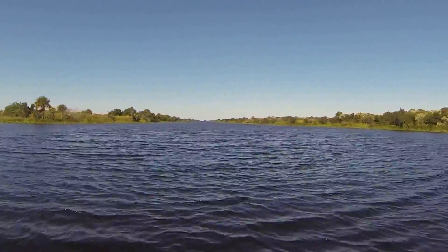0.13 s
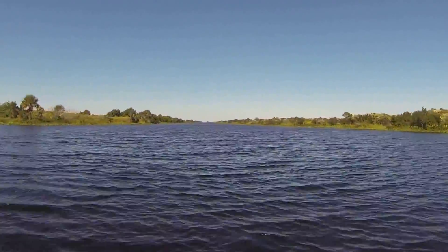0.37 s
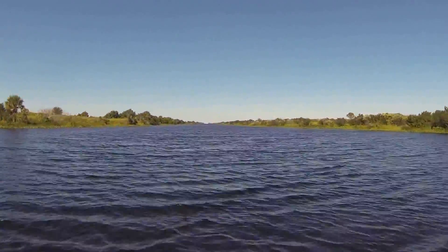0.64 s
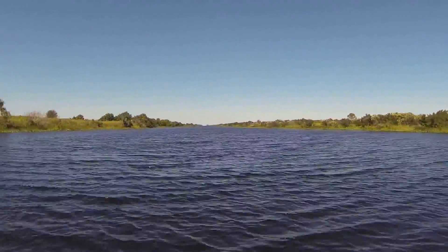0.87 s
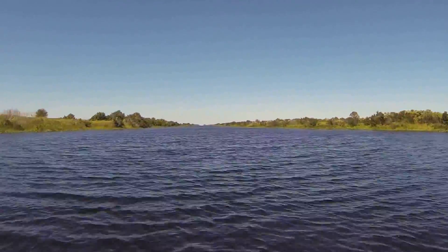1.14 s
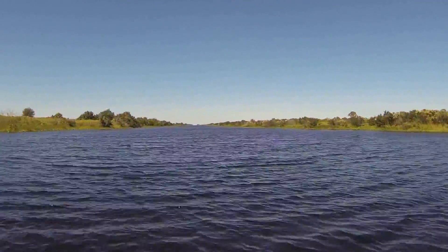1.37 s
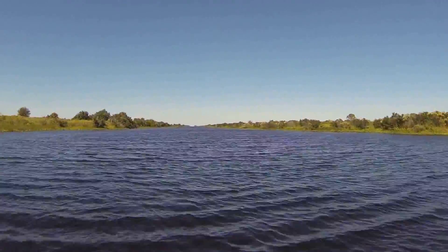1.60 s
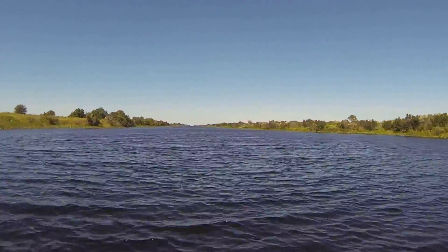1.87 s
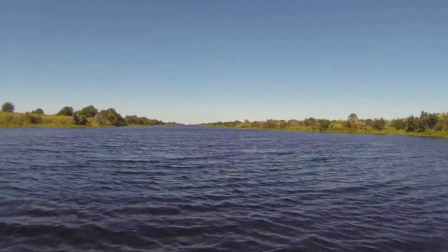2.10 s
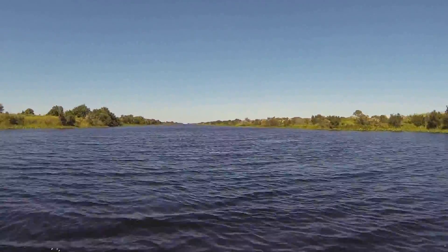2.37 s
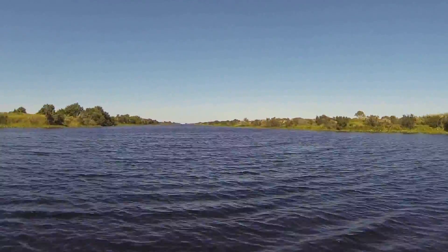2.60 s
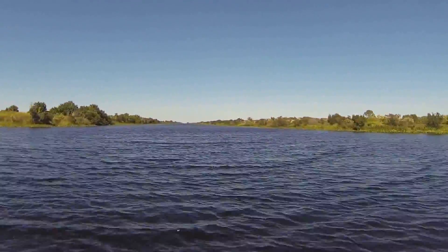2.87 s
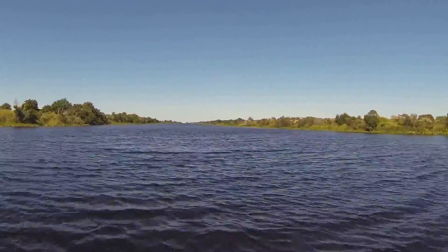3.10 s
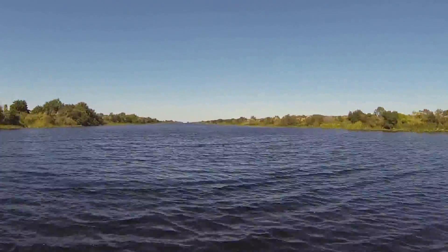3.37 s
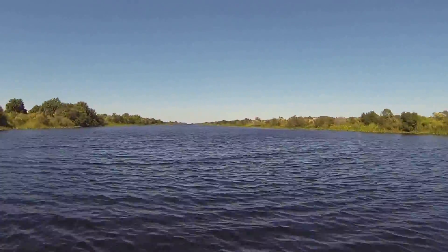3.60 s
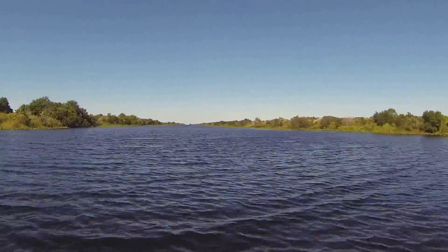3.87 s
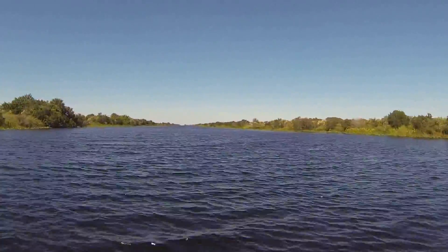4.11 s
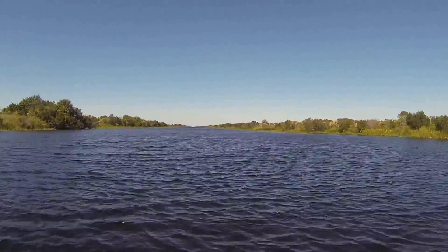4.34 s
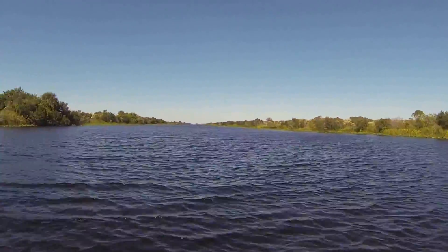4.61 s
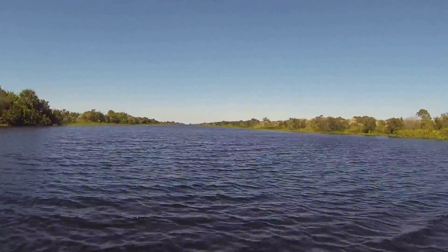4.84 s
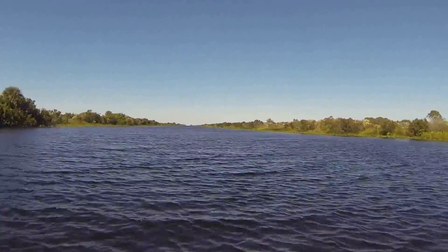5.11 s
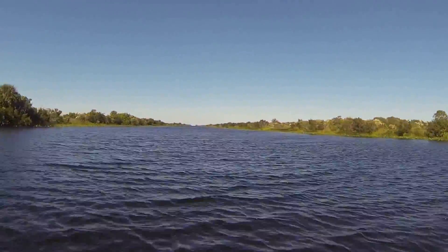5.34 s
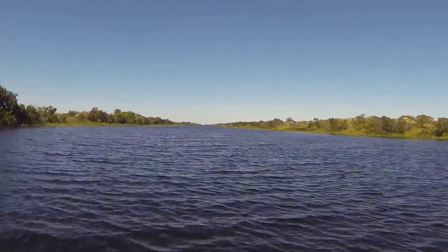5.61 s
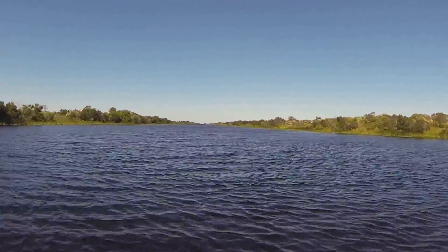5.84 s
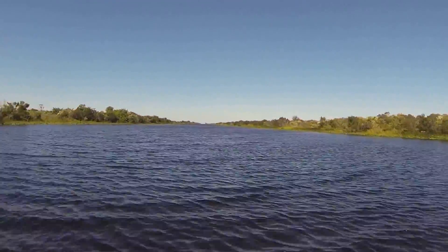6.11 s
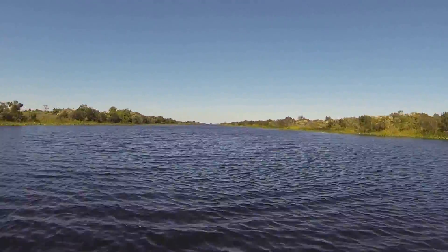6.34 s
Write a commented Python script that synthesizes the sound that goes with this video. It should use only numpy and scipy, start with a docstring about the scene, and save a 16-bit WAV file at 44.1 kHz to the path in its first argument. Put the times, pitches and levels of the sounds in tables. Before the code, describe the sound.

On a propeller-driven boat crossing open water, a low engine drone runs without a break under heavy wind rumble and a thin hiss of spray. Dull wind thumps hit the small enclosed microphone every fraction of a second, hardest just before the middle, briefly pushing everything down. A loose part rattles faintly throughout, and two tiny ticks come close together late on. Close, muffled, mono, outdoors without echo.

```python
"""Close on a propeller-driven boat over open water: a small microphone in a closed housing, in mono.
From the start sines at multiples of the turning rate drone over filtered-noise wind rumble and spray hiss,
while random strikes on ringing modes rattle faintly. Wind buffets, short low pulses, make a limiter duck it all.
The hardest come at 2.4 to 2.9 s, with a rattle tick at 2.6 s; just after, engine speed sags a little and recovers,
the drone brightens, and two close ticks come near 4.9 s as buffets and rushes of spray go on to the end."""
import sys
import numpy as np
from scipy import signal
from scipy.fft import rfft, irfft, next_fast_len
from scipy.io import wavfile

SR = 44100
rng = np.random.default_rng(int(sys.argv[2]) if len(sys.argv) > 2 else 0)


def dump_mix(stems):
    """Bounce the given channels to the path in sys.argv[1] as a 16-bit WAV at rate SR."""
    frames = np.atleast_2d(stems).T  # one column per channel
    limited = np.clip(frames, -1, 1)  # hard clip at full scale
    pcm = np.round(limited * 32767).astype(np.int16)
    wavfile.write(sys.argv[1], SR, pcm)


def voltage_ratio(decibels):
    """Convert decibels (scalar or array-like) to amplitude ratios, 20 dB per decade."""
    exponent = np.asarray(decibels, float) / 20
    return 10 ** exponent


N = 285327   # length in samples

# Strength of the airstream about its mean. Each row: time in seconds, level in dB.
AIRSTREAM = [(0, -0.9), (.3, -0.9), (.8, 0.2), (2.2, 0.8), (3.2, 0.05), (4.2, 1), (5.2, -0.04), (6.47, 0.8)]
# Colour of the wind rumble. Each row: frequency in Hz, relative level in dB per Hz.
RUMBLE_SPECTRUM = [(6, -37.5), (15, -12.5), (28, -2), (41, -7), (54, 3), (66, -3.5), (80, -1), (122, 0),
                   (147, -6), (170, -9), (186, -13.5), (215, -9), (245, -16.5), (305, -21), (332, -17),
                   (352, -20), (372, -16), (395, -19.5), (415, -27), (440, -37.5), (700, -59.5)]
# Colour of blade and spray hiss before the housing. Each row: frequency in Hz, relative level in dB per Hz.
HISS_SPECTRUM = [(330, -31.5), (450, -8), (600, -5.5), (760, -2), (920, -8), (1400, -5.5), (2000, -7),
                 (2350, -11.5), (3250, -18.5), (3800, -24), (5500, -31.5), (7600, -44), (9000, -42.5),
                 (11700, -47), (13000, -62.5), (15600, -76.5)]
# Housing resonances, applied to the hiss. Each row: frequency in Hz, width in Hz, boost in dB.
HOUSING_RESONANCES = [(552, 99, 6), (1089, 134, 7), (1697, 120, 4), (2734, 180, 4.5), (3440, 62, 4.5),
                      (4510, 670, 6), (6840, 900, 6), (7950, 480, 7.5), (11200, 980, 4)]
# Short rushes of spray. Each row: centre in seconds, swell in dB, time from centre to 1/e of it in seconds.
SPRAY_RUSHES = [(0.582, 1.5, .08), (0.89, 1.5, .04), (1.45, 1, 0.11), (1.95, 1.5, .05), (2.256, 2.5, 0.064),
                (4.452, 1, 0.04), (4.84, 3, .04), (5.457, 2.5, 0.071)]
# Modes of a loose part in the shaking hull. Each row: frequency in Hz, relative level in dB, t60 in seconds.
RATTLE_MODES = [(566, -3.5, 0.033), (847, -10, 0.044), (1123, -2.5, 0.045), (1674, -0.5, .02),
                (2600, -13, 0.015)]
# The clearest rattle ticks. Each row: start in seconds, strike level in dB before the mode levels.
RATTLE_TICKS = [(2.62, -24), (4.862, -22.5), (4.899, -21)]
# Wind buffets on the housing. Each row: centre in seconds, pulse peak above the limiter ceiling in dB.
BUFFETS = [(0.157, 4.5), (0.371, 2.5), (0.677, 2), (0.921, 4), (1.579, 4), (1.76, 3.5), (2.159, 0.5),
           (2.388, 10.5), (2.577, 10), (2.855, 7), (3.122, 2), (3.355, 3), (3.663, 3.5), (4.093, 4.5),
           (4.713, 3.5), (5.127, -1.5), (5.557, 5.5), (5.834, 3), (6.12, 1.5)]
# Engine speed, sagging a little just after the hardest buffets, and the load that brightens the drone.
# Each row: time in seconds, turning rate in Hz, change of the multiples above the second in dB.
ENGINE_SPEED = [(0, 53.3, -1.5), (0.8, 53.2, -1.5), (1.6, 53.34, -1), (2.4, 53.29, 0.5), (3.1, 52.7, -.5),
                (4.8, 53.12, 1.1), (5.6, 53.16, 1.5), (6.47, 53.01, 1.5)]
# Drone before load and waver. Each row: multiple of the turning rate, level in dB rms.
ENGINE_ORDERS = [(1, -32), (2, -14.5), (3, -18), (4, -34), (5, -46.5), (6, -34), (7, -42), (8, -45.5),
                 (10, -48.5), (11, -53), (12, -50.5), (13, -53)]

RUMBLE_DB, HISS_DB = -14.5, -30.5   # rms at 0 dB of airstream
RUMBLE_FOLLOWS = 1.4   # dB of rumble per dB of airstream
RATTLE_PER_S, RATTLE_DB = 90, -42   # typical touches a second; rms of the random touches
BUFFET_HZ, BUFFET_S = 101, 0.0051   # swing frequency; time from centre to 1/e
CEILING_DB, ATTACK_S, RELEASE_S = -3, 0.00027, 0.12   # limiter
LINGER_SHARE, LINGER_S = 0.25, 0.46   # added slow share of each cut; its time constant


def rms_one(x):
    """Scale to rms 1."""
    return x / np.sqrt(np.mean(x ** 2) + 1e-20)


def in_time(rows):
    """Columns of a table as curves, one value a sample."""
    s, *columns = np.transpose(rows)
    return [np.interp(np.arange(N) / SR, s, column) for column in columns]


def drift(rate_hz):
    """Slow chance: noise twice through a one-pole low-pass, run in; spread 1."""
    hop = 40   # samples between drawn values
    r = np.exp(-2 * np.pi * hop * rate_hz / SR)
    noise = rng.standard_normal(N // hop + 2002)
    slow = signal.lfilter([1], [1, -2 * r, r * r], noise)[2000:]
    return np.interp(np.arange(N) / hop, np.arange(len(slow)), rms_one(slow))


def patchy_noise(spectrum, shared_db, own_db, count):
    """Coloured noise in overlapping bands; all bands share one flutter and each adds its own; rms 1."""
    size = next_fast_len(N)
    log_hz = np.log(np.arange(size // 2 + 1) * SR / size + 1)
    hz, db = np.transpose(np.array(spectrum, float))
    colour = voltage_ratio(np.interp(log_hz, np.log(hz), db, left=-120, right=-120))
    noise = rfft(rng.standard_normal(size)) * colour
    centres, step = np.linspace(np.log(hz[0]), np.log(hz[-1]), count, retstep=True)
    total = np.zeros(N)
    for centre in centres:
        window = np.clip(1 - abs(log_hz - centre) / step, 0, 1)
        band = irfft(noise * window, size)[:N]
        total += band * voltage_ratio(shared_db + own_db * drift(25))
    return rms_one(total)


def rumble(level_db, flutter):
    """Turbulence over the housing comes in slight lumps; its tallest swings are rounded off."""
    top = 2.4   # times the rms
    lumps = patchy_noise(RUMBLE_SPECTRUM, 1.4 * flutter, own_db=0.0, count=8)
    return voltage_ratio(level_db) * rms_one(np.tanh(lumps / top))


def hiss(level_db, turns, flutter):
    """Blade and spray noise: flutters with the airstream, swells once a turn and in rushes, with fine grains."""
    t = np.arange(N) / SR
    flutter_db = 0.75 * drift(2.5) + 0.96 * flutter
    flutter_db += 0.98 * drift(200)   # fine grains
    flutter_db += 0.14 * np.cos(turns)
    for s, db, length in SPRAY_RUSHES:
        flutter_db += db * np.exp(-((t - s) / length) ** 2)
    out = patchy_noise(HISS_SPECTRUM, flutter_db, own_db=-0.15, count=12)
    for hz, width_hz, db in HOUSING_RESONANCES:
        r, w = np.exp(-np.pi * width_hz / SR), 2 * np.pi * hz / SR
        b, a = [(1 - r * r) / 2, 0, (r * r - 1) / 2], [1, -2 * r * np.cos(w), r * r]
        out = out + (voltage_ratio(db) - 1) * signal.lfilter(b, a, out)
    return voltage_ratio(level_db) * rms_one(out)


def rattle():
    """Uneven touches, clumped by the shaking, set every mode ringing with a strength of its own."""
    touches = rng.random(N) < RATTLE_PER_S * voltage_ratio(4 * drift(14)) / SR
    sizes = voltage_ratio(3.8 * np.minimum(rng.exponential(1, N), 4)) * touches
    tick_strikes = np.zeros(N)
    tick_strikes[[round(s * SR) for s, db in RATTLE_TICKS]] = voltage_ratio(np.array(RATTLE_TICKS)[:, 1])
    crowd, ticks = np.zeros(N), np.zeros(N)
    for hz, db, t60 in RATTLE_MODES:
        r, w = voltage_ratio(-60 / (t60 * SR)), 2 * np.pi * hz / SR
        strikes = np.stack([sizes * rng.standard_normal(N), tick_strikes]) * voltage_ratio(db) + 1e-18
        rung = signal.lfilter([0, np.sin(w)], [1, -2 * r * np.cos(w), r * r], strikes)
        crowd += rung[0]
        ticks += rung[1]
    return voltage_ratio(RATTLE_DB) * rms_one(crowd) + ticks


def with_buffets(low):
    """Each buffet is a short suck of pressure with a swing before and after; it swamps the low sound."""
    at = [round(s * SR) for s, db in BUFFETS]
    places, peaks = np.zeros(N), np.zeros(N)
    places[at] = 1
    peaks[at] = voltage_ratio(CEILING_DB + np.array(BUFFETS)[:, 1])
    t = np.arange(-2000, 2001) / SR
    bell = np.exp(-(t / BUFFET_S) ** 2)
    swamped = signal.fftconvolve(places, bell, "same")
    pulses = signal.fftconvolve(peaks, np.cos(2 * np.pi * BUFFET_HZ * t) * bell, "same")
    return low * (1 - swamped) - pulses


def engine(turns, load_db):
    """Each multiple of the turning rate is a slightly wavering sine; higher ones lag, as in a spread pulse."""
    waver_db, lag = 0.7, 0.302   # lag in radians, times the multiple squared
    drone = np.zeros(N)
    for k, db in ENGINE_ORDERS:
        level_db = db + load_db * (k > 2) + waver_db * drift(2.6)
        drone += np.sqrt(2) * voltage_ratio(level_db) * np.cos(k * turns - lag * k * k)
    return drone


def scene():
    """Engine, airstream, buffets and rattle at the microphone."""
    turns_hz, load_db = in_time(ENGINE_SPEED)
    turns = 2 * np.pi * np.cumsum(turns_hz) / SR   # shaft angle in radians
    stream_db, = in_time(AIRSTREAM)
    flutter = drift(33)   # eddies shake rumble and hiss together
    low = rumble(RUMBLE_DB + RUMBLE_FOLLOWS * stream_db, flutter) + engine(turns, load_db)
    mix = hiss(HISS_DB + stream_db, turns, flutter) + rattle() + with_buffets(low)
    return mix[None]


def band_limit(x):
    """A steep low-pass at the top of the band."""
    return signal.sosfilt(signal.butter(12, 15650, fs=SR, output="sos"), x)


def record(dry):
    """A peak limiter cuts gain fast above its ceiling and lets it creep back, a part of it slowly."""
    over_db = np.maximum(20 * np.log10(abs(dry) + 1e-9) - CEILING_DB, 1e-3)
    ramp = np.arange(N) / SR / RELEASE_S
    # each cut dies away exponentially until a larger one takes over
    held_db = np.exp(np.maximum.accumulate(np.log(over_db) + ramp, axis=1) - ramp)
    fast = np.exp(-1 / (ATTACK_S * SR))
    slow = np.exp(-1 / (LINGER_S * SR))
    cut_db = signal.lfilter([1 - fast], [1, -fast], held_db)
    cut_db = cut_db + LINGER_SHARE * signal.lfilter([1 - slow], [1, -slow], cut_db)
    limited = dry * voltage_ratio(-cut_db)
    top = 2.0   # what slips past the attack is rounded by the input stage
    return band_limit(top * np.tanh(limited / top))


dry = scene()
out = record(dry)
dump_mix(out)
```